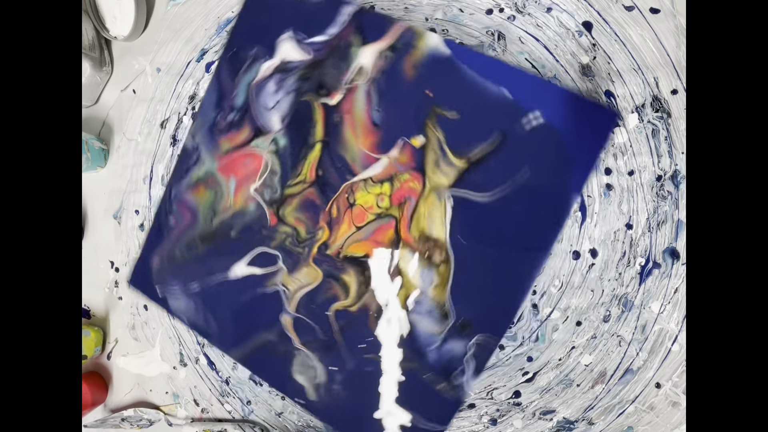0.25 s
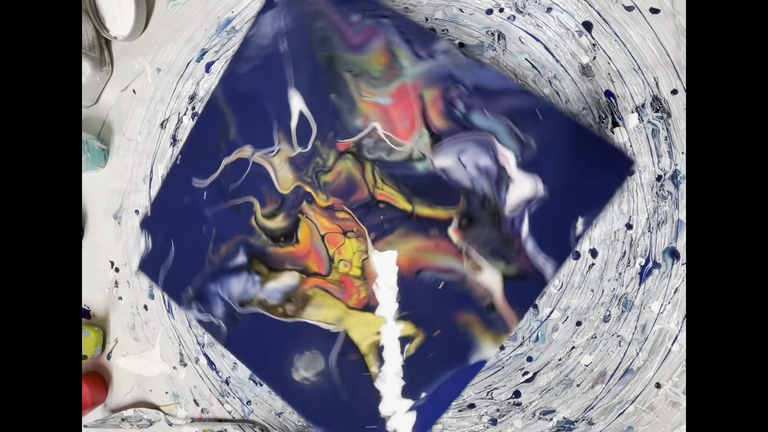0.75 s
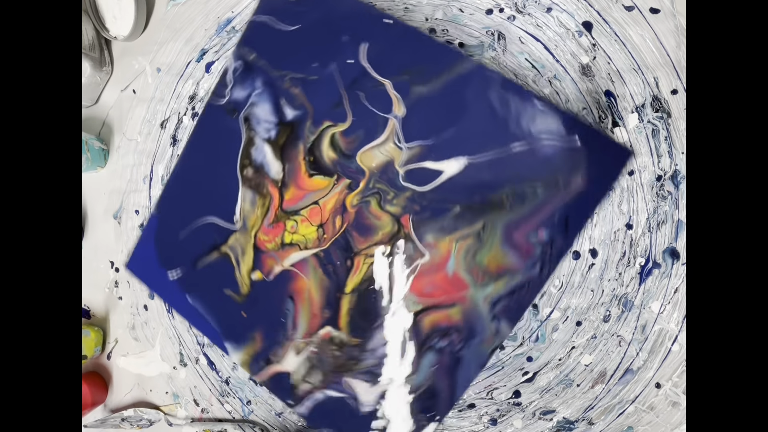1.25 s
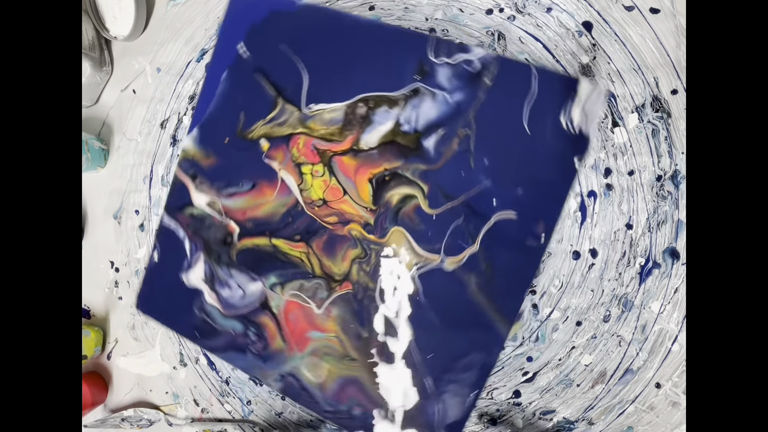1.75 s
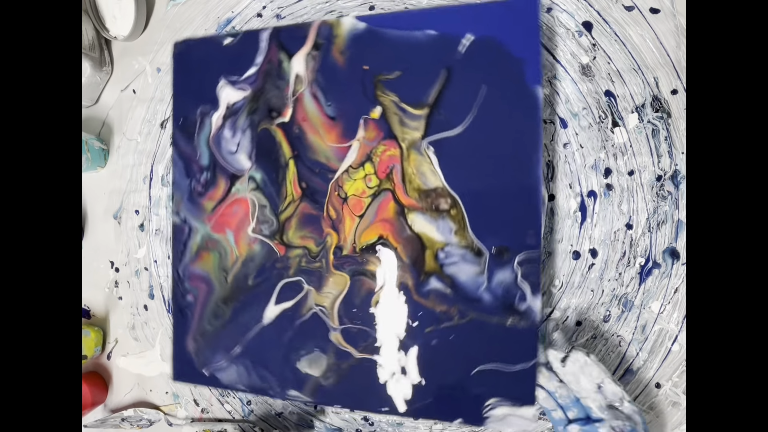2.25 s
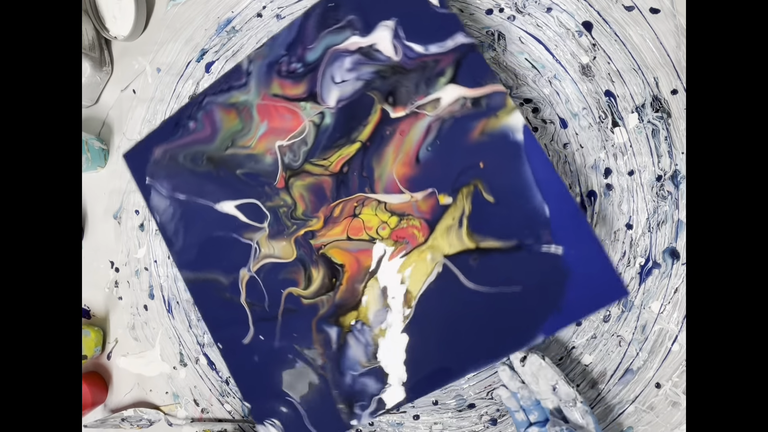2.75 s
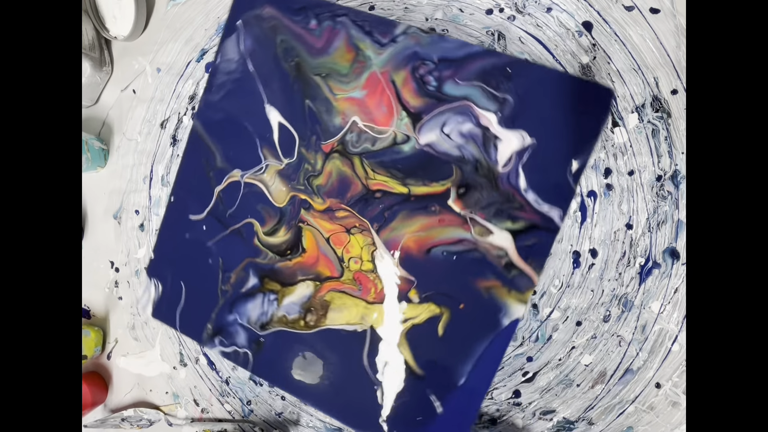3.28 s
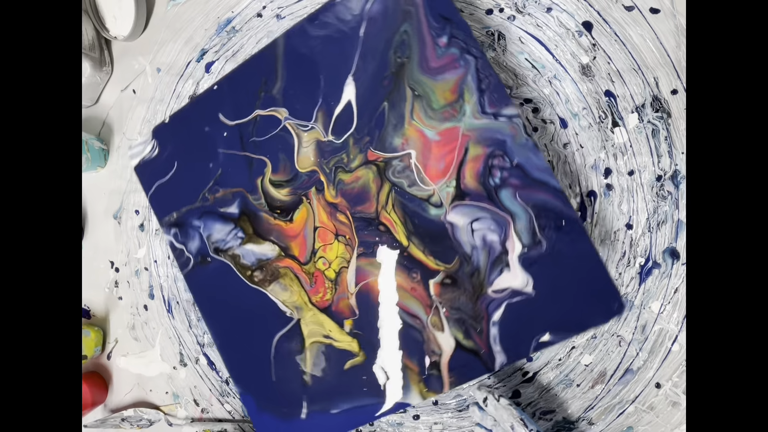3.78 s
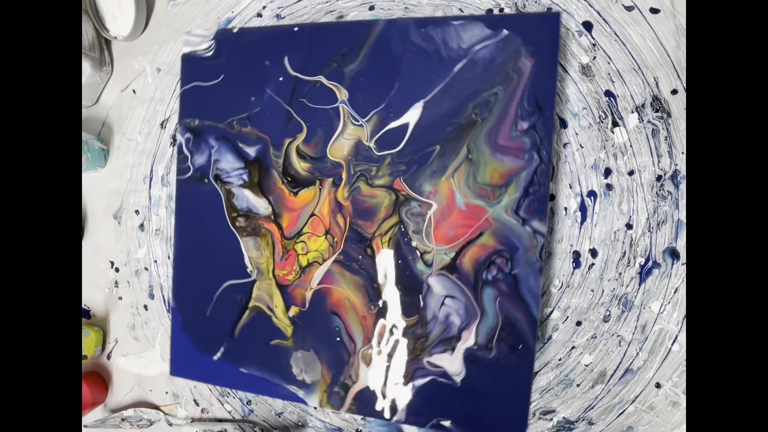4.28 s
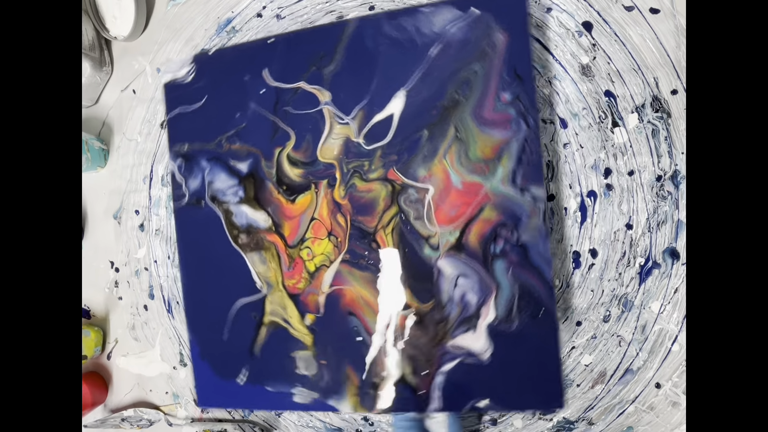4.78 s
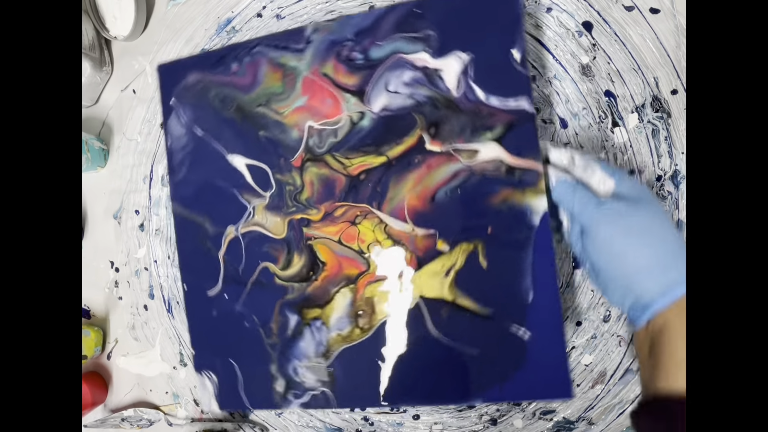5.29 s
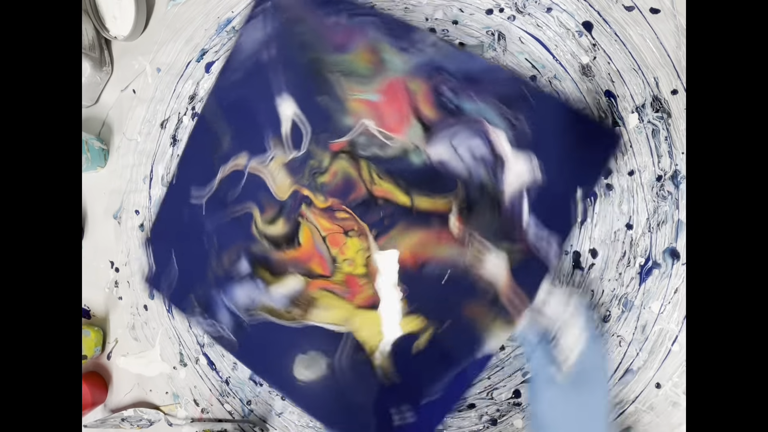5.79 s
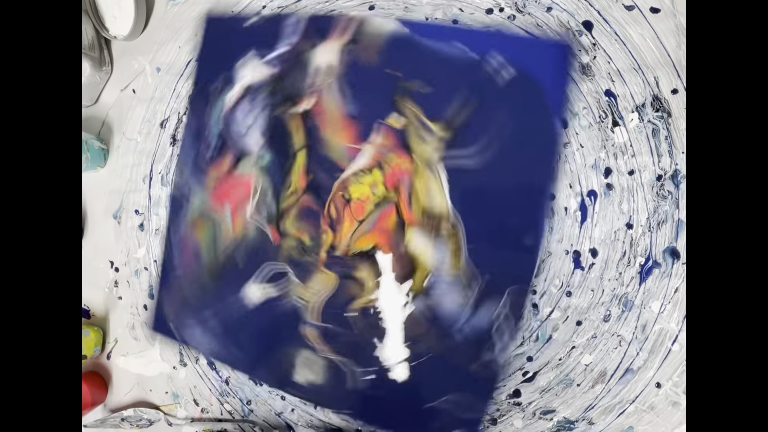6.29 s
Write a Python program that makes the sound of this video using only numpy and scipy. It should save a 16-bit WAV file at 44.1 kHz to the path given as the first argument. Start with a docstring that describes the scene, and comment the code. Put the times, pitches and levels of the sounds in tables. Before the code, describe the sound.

A spinning turntable's bearings hiss and tick, with a few soft wooden knocks, while a muffled engine rises to a low drone outside.

```python
"""A hand-spun canvas turns on a ball-bearing turntable in a garage; it slows, is caught and flung again.
The balls hiss and tick in their race and ring the bearing plates; a gloved hand knocks the wooden frame.
Outside, a lumpy eight-cylinder engine climbs from idle, its low orders and exhaust coming through the
walls. All of it, with the room's air, is heard at the two microphone ports of a phone above the canvas."""
import sys
import numpy as np
from scipy import signal
from scipy.fft import rfft, irfft
from scipy.io import wavfile
from scipy.ndimage import uniform_filter1d

SR = 44100
rng = np.random.default_rng(int(sys.argv[2]) if len(sys.argv) > 2 else 0)


def transcribe(u):
    """Save the signal u as a 16-bit wav file named by the first command-line argument.

    u: samples, shape (n,) or (channels, n), limited to [-1, 1]; the rate is SR.
    q: integer samples, one column per channel.
    """
    v = np.clip(np.atleast_2d(u).T, -1, 1)
    q = np.round(v * 32767).astype(np.int16)
    wavfile.write(sys.argv[1], SR, q)


N = 288414

# Rings heard in the rolling and ticks: bearing plates, plus the microphone's resonance near 10.6 kHz.
# Each row: pitch in Hz, bandwidth in Hz, relative level in dB.
RING_MODES = [(1481.6, 94, -11), (2757, 150, -1.5), (3199, 250, -6.5), (5399, 300, -8), (6060, 320, -4.5),
              (10587, 900, -5)]


def rolling(grains_per_s=150, spread_db=5.0, rattle_db=-2.5, grain_s=0.00187, flicker_db=2.5):
    """Balls on a rough race: a hiss with short uneven rattles that ring the plates and the microphone."""
    # Weight of the grind. Each row: time in seconds, lower mids over the hiss in dB.
    grind = [(0, 2.5), (.8, -4), (2.0, 4), (3.0, 1.5), (4.3, 3), (4.42, -2.5), (4.55, 4.5), (5.2, -2),
             (5.9, -1.5), (6.25, -0.5), (6.54, -3.5)]
    chance, size = rng.random((2, N))
    size_db = np.minimum(-spread_db * np.log(size + 1e-9), 9)
    bumps = (chance < grains_per_s / SR) * undb(size_db)
    rattle = signal.lfilter([1], [1, -np.exp(-1 / (grain_s * SR))], bumps) * rng.standard_normal(N)
    rough = level(rattle, rattle_db) + rng.standard_normal(N)
    rings = sum(undb(db + 5.02 * walk(18)) * signal.lfilter(*signal.iirpeak(hz, hz / width, SR), rough)
                for hz, width, db in RING_MODES)
    flutter_db = 1.2 * walk(80) + walk(20)
    roll = level(rough + rings, 1.884) * undb(spin_level() + flutter_db)
    top = signal.lfilter(*signal.butter(N=2, Wn=8000, btype="high", fs=SR), roll)
    dull = roll * undb(curves(grind)[0] + flicker_db * walk(16))
    bright = roll + (undb(.5 * flicker_db * walk(20)) - 1) * top  # the top flickers on its own
    return body(dull, bright)


def spin_level(rise_s=0.01586):
    """Rolling level in dB: the spin's slow course, plus surges as balls bunch or the glove drags."""
    # The spin dies away, is stopped and flung again. Each row: time in seconds, level in dB.
    course = [(0.0, -66), (1.0, -67.5), (1.6, -65.5), (1.95, -68), (2.3, -73), (2.54, -80), (2.7, -72.5),
              (3.17, -71.5), (3.33, -78.5), (3.9, -79), (4.12, -73), (4.2, -79.5), (4.32, -78), (4.38, -80),
              (4.58, -85), (4.84, -73.5), (5.3, -74), (5.48, -86), (5.66, -85.5), (5.7, -70.5),
              (5.82, -61.5), (6.06, -62), (6.3, -59.5), (6.54, -54)]
    # Each row: crest time in seconds, level in dB, seconds to fall 10 dB.
    surges = [(.04, -62, 0.2045), (.265, -64, 0.14), (.37, -63, 0.14), (.57, -62.5, 0.03), (.69, -66, 0.12),
              (.86, -63.5, 0.14), (1.03, -62, 0.1041), (1.18, -64, 0.107), (1.29, -64, .1),
              (1.47, -62.5, .06), (1.549, -62, 0.1378), (1.71, -62.5, 0.2129), (1.94, -65, 0.3475),
              (2.1, -65, 0.2), (2.36, -66, 0.0725), (2.46, -69, 0.0142), (2.58, -70.5, .2),
              (2.988, -64.5, 0.09), (3.26, -69.5, 0.0621), (3.368, -65.5, 0.1222), (3.64, -71, 0.03),
              (3.82, -72, 0.11), (4.235, -57.5, 0.1142), (4.425, -64.5, 0.08), (4.62, -73, 0.03),
              (4.7, -59, 0.1041), (4.928, -58, 0.0367), (5.0, -60, 0.1229), (5.18, -66.5, 0.01),
              (5.26, -69.5, 0.11), (5.85, -52.5, 0.21), (6.095, -56, 0.33), (6.199, -55, 0.08)]
    t = np.arange(0, N / SR, .001)
    crest, db, fall_s = np.transpose(surges)[:, :, None]
    surge_db = db - 10 * np.where(t < crest, ((crest - t) / rise_s) ** 2, (t - crest) / fall_s)
    power = undb(2 * np.interp(t, *np.transpose(course))) + undb(2 * surge_db).sum(axis=0)
    return np.interp(np.arange(N) / SR, t, 10 * np.log10(power))


def ticks(crack_s=0.000946, tail_db=-10, tail_t60=0.043, dull_db=8, ring_db=-12, snap_db=-14):
    """Ball ticks and glove snaps: ringing cracks through the body, their top cutting through the air."""
    # Each row: start in seconds, level in dB, lower-mid offset in dB.
    hits = [(0.0378, -47.5, -7.5), (0.388, -51, -13.5), (0.5675, -47, -15.5), (0.7079, -51, -12.5),
            (1.009, -53, -24.5), (1.4713, -47.5, -10.5), (1.5473, -50, -18), (1.7046, -53.5, -7.5),
            (2.1, -56, -6.5), (3.0061, -54.5, -27.5), (4.223, -46.5, -1), (4.239, -47, -3),
            (4.2533, -45.5, -10.5), (4.3945, -53.5, -27.5), (4.4117, -46, -26.5), (4.6072, -56.5, -21.5),
            (4.6802, -37.5, -9), (4.6995, -48, -19.5), (4.7657, -62.5, 11), (4.8864, -56.5, -19.5),
            (4.902, -63.5, 6), (4.9138, -48.5, -1.5), (4.9247, -42, -22.5), (4.9321, -42, -16),
            (4.9722, -39, -6.5), (4.987, -49, -15), (5.0016, -48.5, -23.5), (5.014, -40.5, -29),
            (5.676, -54.5, -20), (5.8273, -47, -8), (5.8495, -43.5, -11), (5.872, -40, -22.5),
            (5.9225, -42, -23.5), (5.9992, -47.5, -18.5), (6.0904, -42, -10), (6.0966, -43, -10),
            (6.1276, -46.5, -9), (6.1554, -46, -4), (6.1943, -39, -6.5), (6.2175, -43.5, -17.5),
            (6.2453, -39.5, -9.5), (6.2718, -44.5, -6), (6.2973, -48.5, -6), (6.377, -44, -19),
            (6.3968, -43.5, -20.5), (6.4478, -46, -11), (6.5184, -44, -14.5)]
    t = np.arange(SR // 8) / SR
    hz, width, mode_db = np.transpose(RING_MODES)[:, :, None]
    dull, bright = np.zeros((2, N + len(t)))
    for start, db, low_mid_db in hits:
        span = slice(int(start * SR), int(start * SR) + len(t))
        crack = rng.standard_normal(len(t)) * (np.exp(-t / crack_s) + undb(tail_db) * fade(t, tail_t60))
        jitter = rng.standard_normal((len(hz), 1))
        decays = undb(mode_db + 4 * jitter) * np.exp(-np.pi * width * t)
        rings = decays * np.sin(2 * np.pi * hz * (1 + .02 * jitter[::-1]) * t)
        tick = undb(db) * (crack + undb(ring_db) * rings.sum(axis=0))
        bright[span] += tick
        dull[span] += undb(low_mid_db + dull_db) * tick
    snap = signal.sosfilt(signal.butter(N=4, Wn=11000, btype="high", fs=SR, output="sos"), bright[:N])
    return body(dull[:N], bright[:N]) + undb(snap_db) * snap


def body(dull, bright, split_hz=3500):
    """The lows of one signal and the highs of another, coloured by table, canvas and microphone port."""
    # Each row: frequency in Hz, relative gain in dB.
    response = [(250, -26.5), (550, -3), (1450, -6), (2000, -11.5), (2750, -10.5), (4000, -13),
                (5000, -9.5), (6100, -10.5), (7500, -7.5), (9000, -4), (10700, -3), (11400, -7.5),
                (12000, -22), (13000, -42.5)]
    lows = lambda x: signal.lfilter(*signal.butter(N=2, Wn=split_hz, fs=SR), x)
    noise = rng.standard_normal(N)
    treble_gain = colour(noise - lows(noise), response).std()
    return colour(lows(dull) + bright - lows(bright), response) / treble_gain


def knocks(push_s=0.0006, grip_db=2.0):
    """A gloved hand's soft blows ring the wooden frame; each grip shifts its modes a little."""
    # Each row: start in seconds, level in dB, brightness in dB per octave.
    blows = [(4.223, -42, 0), (4.241, -50, 3.5), (4.683, -40, -0.5), (4.77, -46.5, -3.5), (4.913, -47, 2.5),
             (5.864, -43, -3), (5.884, -45, -2), (6.068, -58, 10.5)]
    # Each row: pitch in Hz, relative level in dB, seconds to fall 60 dB.
    frame_modes = [(461, -6, 0.071), (536.7, -1, 0.054), (593.6, -4, 0.0477), (682.6, -6.5, 0.031),
                   (971, -8.5, 0.028), (1403, -10, .02), (1653, -12, .02)]
    pivot_hz = frame_modes[1][0]
    t = np.arange(SR // 4) / SR
    out = np.zeros(N + len(t))
    for start, db, tilt_db in blows:
        grip = rng.standard_normal(len(frame_modes))
        ring = sum(undb(mode_db + grip_db * shift + tilt_db * np.log2(hz / pivot_hz)) * fade(t, t60)
                   * np.sin(2 * np.pi * hz * (1 + 0.025 * shift) * t)
                   for (hz, mode_db, t60), shift in zip(frame_modes, grip))
        at = int(start * SR)
        out[at:at + len(t)] += undb(db) * ring * (1 - np.exp(-t / push_s))
    return out[:N]


def engine(waver_db=1.0, middle_waver_db=1.94, lump_db=2.5, puff=0.852):
    """Strong orders of the firing rate, weaker eighths that come and go, and a gas puff each firing."""
    # Each row: time in seconds, firing rate in Hz.
    firing = [(0.0, 34.9), (0.3, 35.4), (0.6, 32.1), (0.9, 32.4), (1.0, 35.2), (1.2, 46.5), (1.4, 55.3),
              (1.52, 61.5), (1.74, 64.3), (2.05, 61.4), (2.8, 59.2), (3.05, 60.7), (3.3, 61.5),
              (3.42, 63.4), (3.9, 63.7), (4.2, 64.8), (4.5, 65.2), (4.74, 64.4), (4.9, 69.1), (5.4, 68.7),
              (5.8, 70.6), (6.54, 70.3)]
    # Orders are multiples of the firing rate.
    loud_orders = [1, 2]
    middle_orders = [1.875, 2.375, 3, 3.125]
    high_orders = [4, 6.125]
    # The main drone. Each row: time in seconds, then the two loud orders in dB.
    drone = [(0.0, -71.5, -62), (0.4, -86, -53.5), (0.95, -70.5, -63), (1.1, -58, -48), (1.22, -51.5, -42),
             (1.3, -39.5, -44), (1.38, -35, -59.5), (1.46, -32.5, -48.5), (1.6, -35, -42.5),
             (1.7, -37, -64.5), (2.0, -39, -54), (2.2, -35.5, -44), (2.4, -36, -45.5), (2.8, -36.5, -58),
             (3.0, -37, -46), (3.3, -35.5, -37.5), (4.3, -35, -36), (4.62, -39, -41.5), (5.0, -35.5, -34.5),
             (5.4, -37.5, -37.5), (5.6, -35, -36.5), (6.2, -35, -40.5), (6.54, -37, -37)]
    # Swells where the walls pass best. Each row: time in seconds, then the four middle orders in dB.
    swells = [(0, -75.5, -70.5, -61, -72), (.55, -71, -69.5, -56, -75.5), (1.05, -68.5, -68, -61.5, -69),
              (1.24, -59.5, -66, -46, -67), (1.38, -60.5, -55.5, -60.5, -65.5),
              (1.55, -61, -46.5, -60.5, -62.5), (2.3, -71.5, -46.5, -62.5, -70.5),
              (3.05, -74, -51, -62, -70), (3.4, -56, -52, -51, -73.5), (4.1, -51, -50.5, -55, -75),
              (4.6, -50.5, -52.5, -58, -74), (5.1, -49.5, -56, -55, -59), (5.9, -50.5, -54, -53, -54.5),
              (6.54, -54, -56.5, -62, -58)]
    # Each row: time in seconds, then lumpiness, gas and the two high orders in dB.
    load = [(0, -52, -58, -59.5, -77.5), (.8, -53.5, -62.5, -58.5, -77.5), (1.02, -51, -58, -51, -73.5),
            (1.2, -47, -52.5, -69, -70), (1.6, -41.5, -49.5, -66, -78.5), (2.3, -43.5, -52.5, -80, -84),
            (3, -46.5, -53.5, -73.5, -80), (3.5, -45.5, -55, -66, -65.5), (4.6, -45, -54.5, -63, -71.5),
            (6.54, -48, -56, -63, -79)]
    # Lumps from unequal cylinders. Each row: order, level in dB relative to the lumpiness.
    uneven = [(0.75, -18), (0.875, -17.5), (1.25, -15.0), (1.375, -20), (1.5, -22.5), (1.75, -13.5),
              (2.125, -14), (2.25, -18.5), (2.5, -17), (2.625, -11), (3.25, -18.5), (3.375, -14),
              (3.625, -24), (4.625, -20)]
    # Exhaust through walls that stop the treble. Each row: frequency in Hz, relative level in dB.
    roar = [(40, -38), (70, -2.5), (150, -2.5), (250, -6), (330, -10), (400, -11.5), (550, -17),
            (1500, -50)]
    roar_top = [(5000, -100)]
    phase = 2 * np.pi * np.cumsum(curves(firing)[0]) / SR
    lumpiness_db, gas_db, *high_db = curves(load)

    def tone(order):
        """One order; whole orders line up into a pulse, the rest start at a random phase."""
        offset = 2 * np.pi * rng.random() * (order % 1 > 0)
        return -np.sqrt(2) * np.cos(order * phase + offset)

    tones = sum(undb(db + waver_db * walk(9)) * tone(order)
                for order, db in zip(loud_orders + high_orders, curves(drone) + high_db))
    middle = sum(undb(db + middle_waver_db * walk(5)) * tone(order)
                 for order, db in zip(middle_orders, curves(swells)))
    lumps = sum(undb(db + lump_db * walk(1.5)) * tone(order) for order, db in uneven)
    gas = colour(rng.standard_normal(N) * (1 + puff * np.cos(phase)), roar + roar_top)
    return tones + middle + undb(lumpiness_db) * lumps + undb(gas_db) * gas / gas.std()


def garage(air_db=-60):
    """Still air of the room, swelling a little."""
    # Room tone and its top end. Each row: frequency in Hz, relative level in dB.
    air = [(40, -8.5), (70, 2), (140, -9.5), (270, -8.5), (400, -15.5), (900, -18.5), (1500, -29),
           (3000, -40.5)]
    air_top = [(10500, -52), (11800, -90)]
    return level(colour(rng.standard_normal(N), air + air_top), air_db) * undb(walk(2.5))


def ports(common, apart):
    """Two microphone ports: a common part shifted in phase between them, plus a part for each alone."""
    # Each row: frequency in Hz, share of the power common to both ports.
    likeness = [(60, 1), (170, 1), (300, .72), (600, .35), (1500, .65), (3000, .6), (4700, .65), (5600, .8),
                (7000, .88), (10000, .97)]
    # Each row: frequency in Hz, left minus right in dB.
    balance = [(200, 2), (350, 2.5), (640, 2.5), (1150, .5), (2080, -.5), (6790, -1), (12300, -.5)]
    # Each row: frequency in Hz, lead of the left port in radians.
    lead = [(0, 0), (400, -.1), (850, -1.2), (1400, 0), (2400, .3), (3000, 1), (4000, 1), (4700, 2.8),
            (5300, 5.8), (6300, 6.5), (8200, 8.8), (9100, 8.7), (9700, 9.4), (11700, 12.3), (13000, 12.5)]
    side = np.array([[.5], [-.5]])
    alike = np.clip(over_hz(likeness, N), 0, 1)
    tilt = undb(side * over_hz(balance, N))
    shifted = rfft(common) * np.sqrt(alike) * np.exp(1j * side * over_hz(lead, N))
    return irfft(tilt * (shifted + np.sqrt(1 - alike) * rfft(apart)), N)


def reflections(x, decay_s=.008, gain_db=-5):
    """Short reflections smear the phase without colouring the sound, opposite at the two ports."""
    t = np.arange(SR // 20) / SR
    echo = rfft(rng.standard_normal(len(t)) * np.exp(-t / decay_s), N)
    return undb(gain_db) * irfft(rfft(x) * echo / np.abs(echo), N) * np.array([[1], [-1]])


def undb(db):
    return 10 ** (np.asarray(db) / 20)


def level(x, rms_db):
    return x * undb(rms_db) / np.sqrt(np.mean(x ** 2))


def fade(t, t60):
    return np.exp(-np.log(1000) * t / t60)


def curves(table):
    """One envelope for each column after the time."""
    times, *columns = np.transpose(table)
    return [np.interp(np.arange(N) / SR, times, column) for column in columns]


def walk(rate, steps=16):
    """Random levels held 1 / rate seconds and smoothed twice; spread 1."""
    held = np.repeat(rng.standard_normal(int(N / SR * rate) + 2), steps)
    smooth = uniform_filter1d(uniform_filter1d(held, steps), steps)
    return np.interp(np.arange(N) / SR * rate * steps, np.arange(len(smooth)), smooth / smooth.std())


def over_hz(table, size):
    """A (Hz, value) table on the bins of a transform, straight on a log axis."""
    hz, value = np.transpose(table)
    return np.interp(np.log(np.fft.rfftfreq(size, 1 / SR) + 1), np.log(hz + 1), value)


def colour(x, table, size=4096):
    """Causal EQ with the given (Hz, dB) curve, from the folded cepstrum."""
    cepstrum = irfft(np.log(undb(over_hz(table, size))))
    cepstrum[1:size // 2] *= 2
    cepstrum[size // 2 + 1:] = 0
    return signal.fftconvolve(x, irfft(np.exp(rfft(cepstrum))))[:N]


def scene():
    """Engine, ticks and knocks with their reflections, over a wide bed of rolling and room air."""
    direct = engine() + ticks() + knocks()
    common_bed, *side_beds = [rolling() + garage() for _ in range(3)]
    return ports(direct + common_bed, reflections(direct) + np.array(side_beds))


def record(dry, top_hz=12860):
    """The phone cuts the top."""
    return signal.sosfilt(signal.ellip(8, .2, 70, top_hz, fs=SR, output="sos"), dry)


dry = scene()
out = record(dry)
transcribe(out)
```